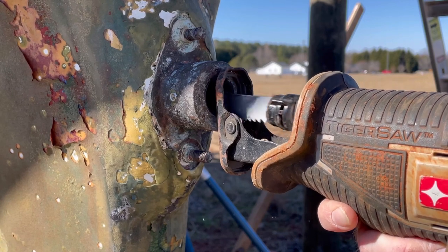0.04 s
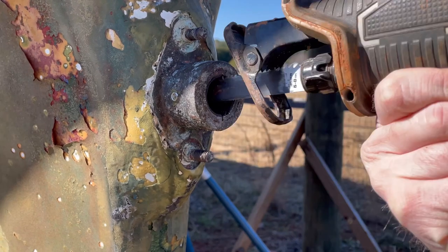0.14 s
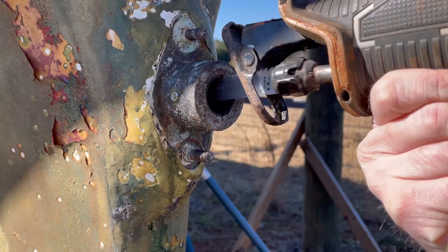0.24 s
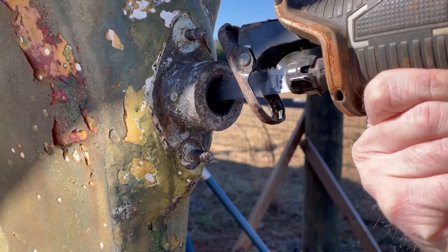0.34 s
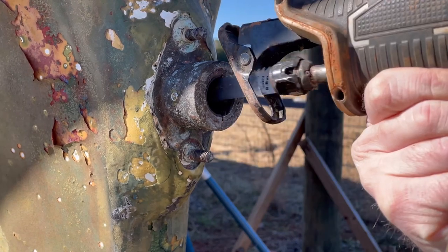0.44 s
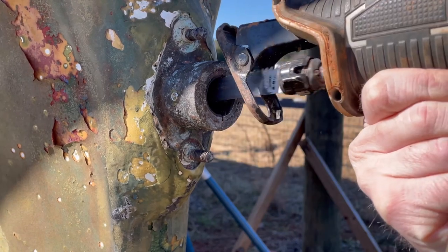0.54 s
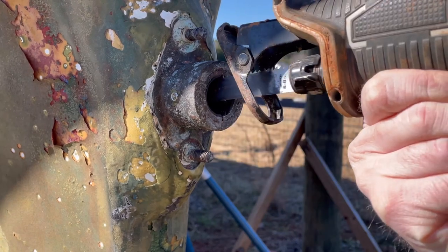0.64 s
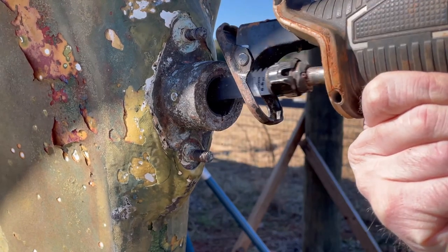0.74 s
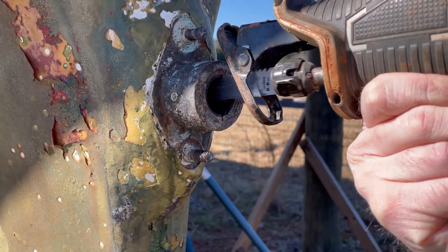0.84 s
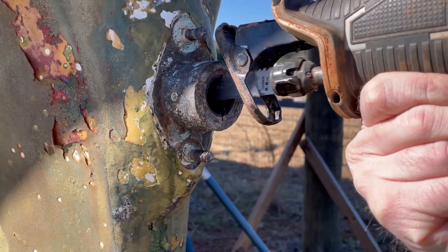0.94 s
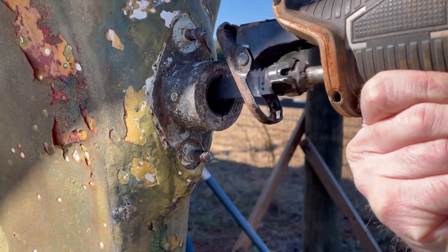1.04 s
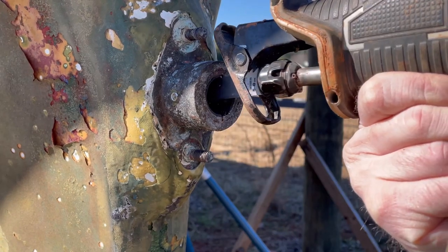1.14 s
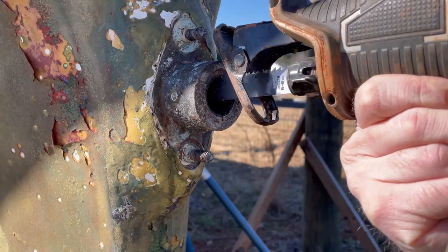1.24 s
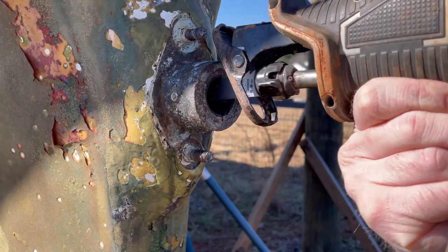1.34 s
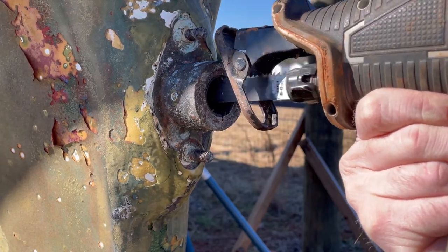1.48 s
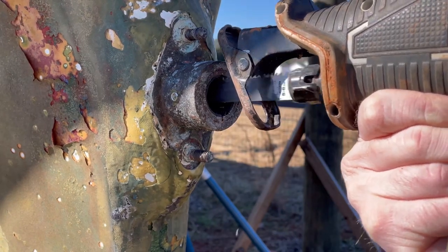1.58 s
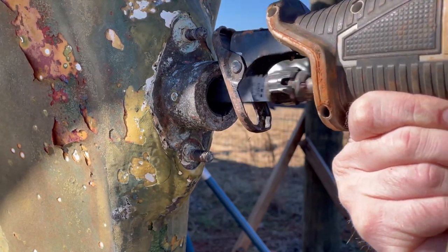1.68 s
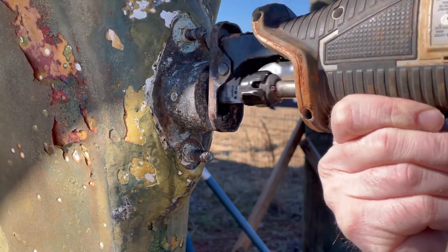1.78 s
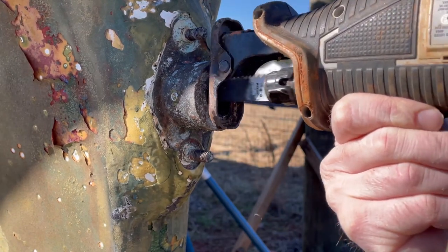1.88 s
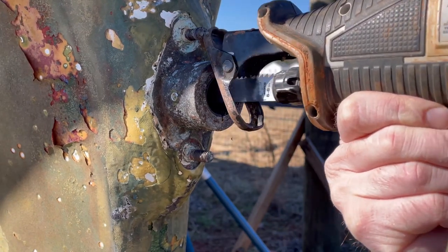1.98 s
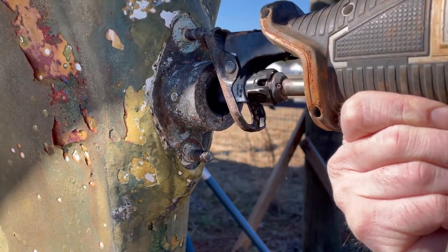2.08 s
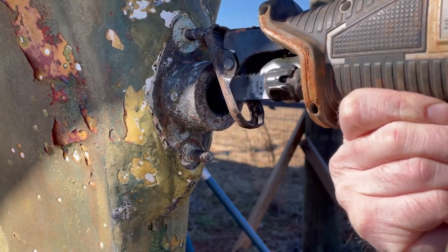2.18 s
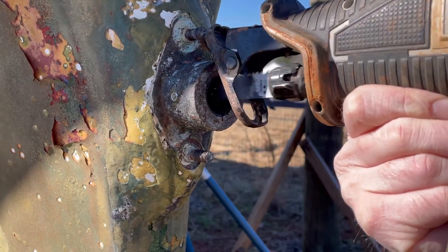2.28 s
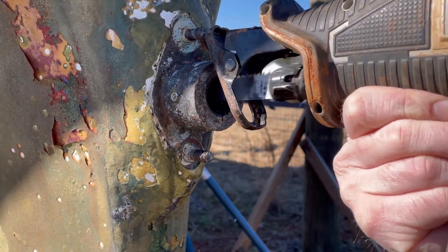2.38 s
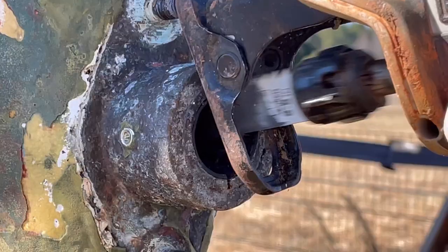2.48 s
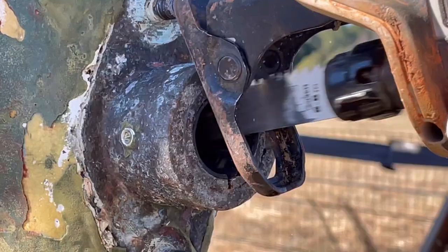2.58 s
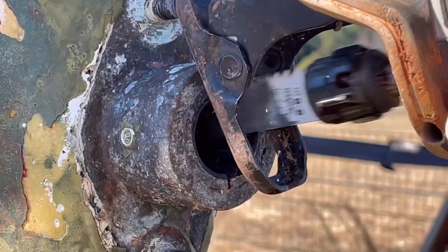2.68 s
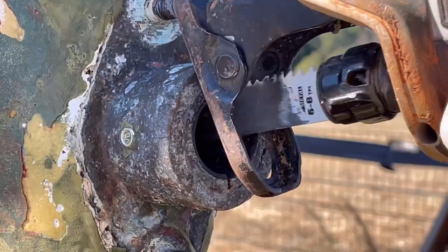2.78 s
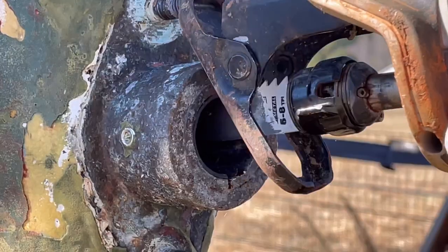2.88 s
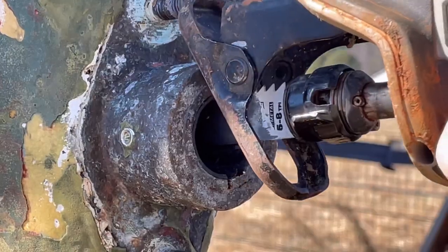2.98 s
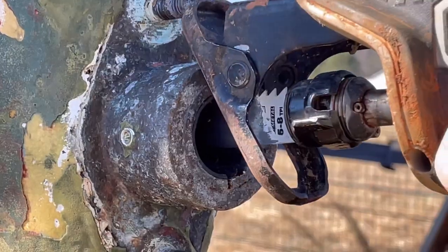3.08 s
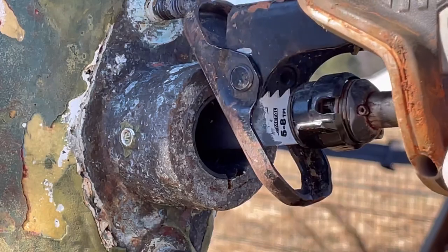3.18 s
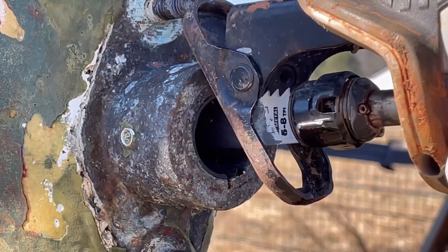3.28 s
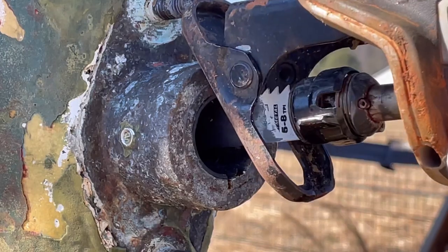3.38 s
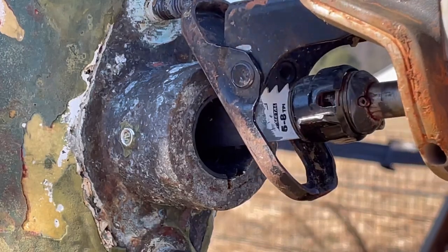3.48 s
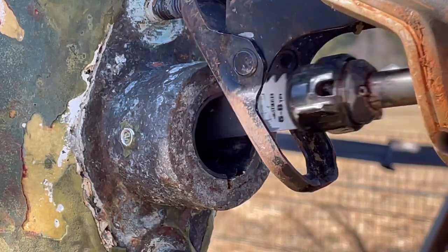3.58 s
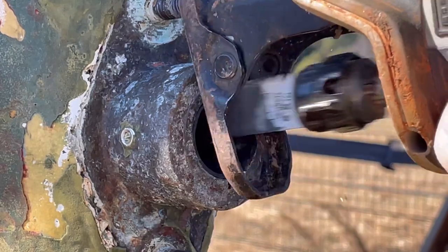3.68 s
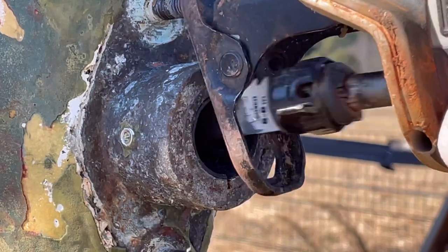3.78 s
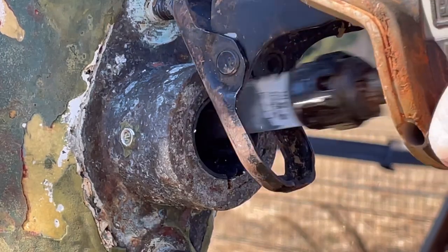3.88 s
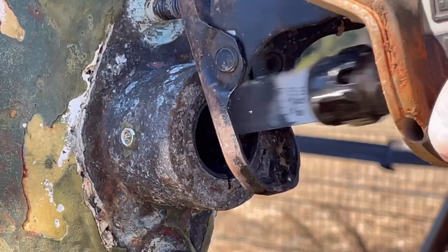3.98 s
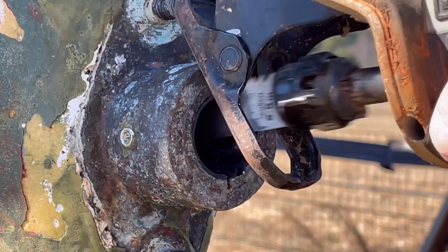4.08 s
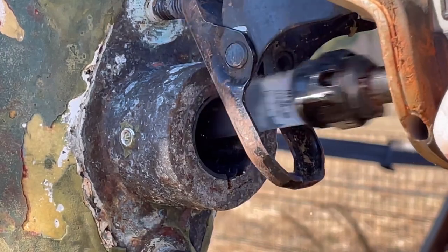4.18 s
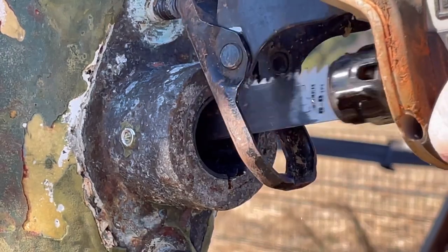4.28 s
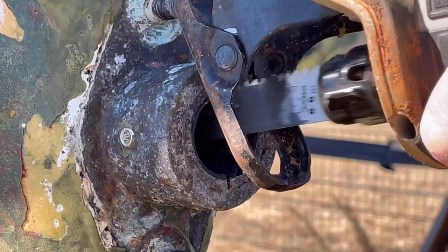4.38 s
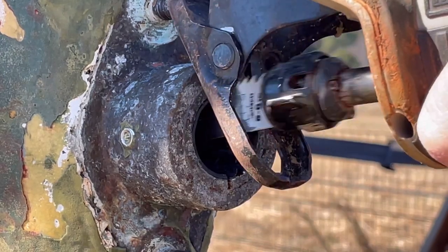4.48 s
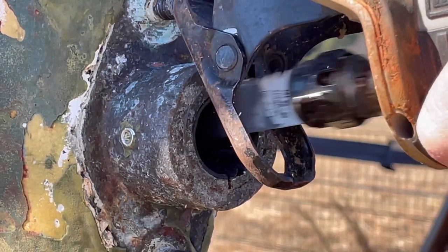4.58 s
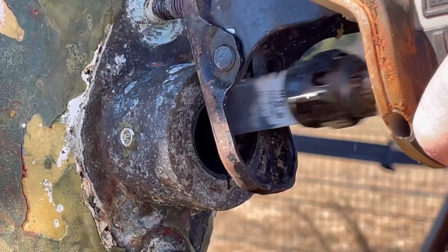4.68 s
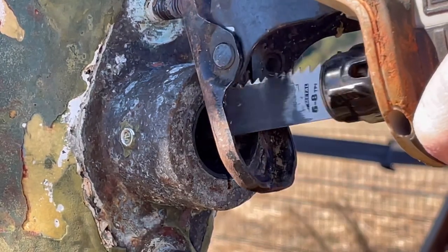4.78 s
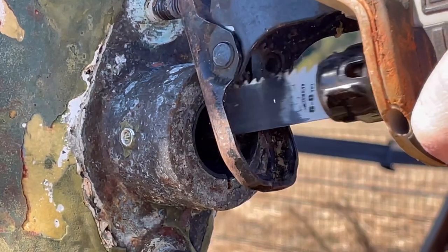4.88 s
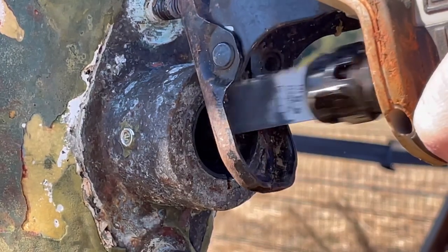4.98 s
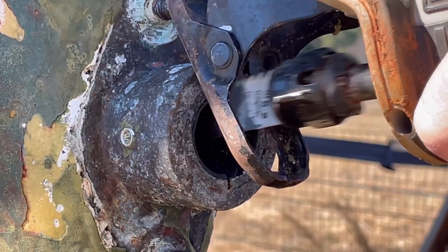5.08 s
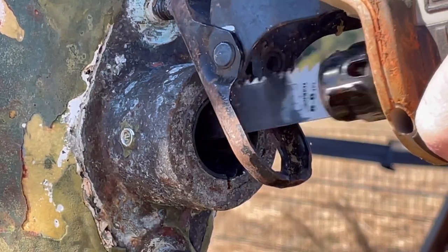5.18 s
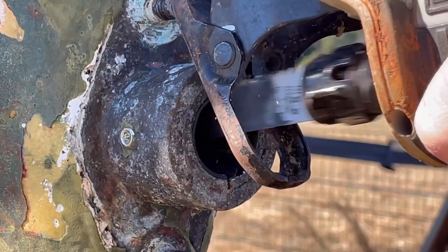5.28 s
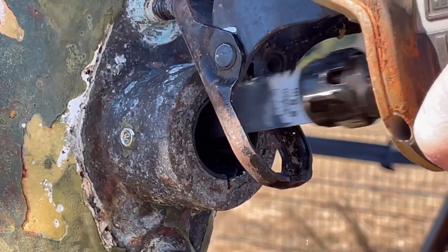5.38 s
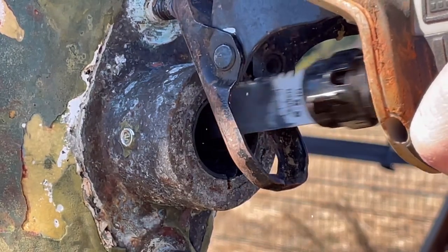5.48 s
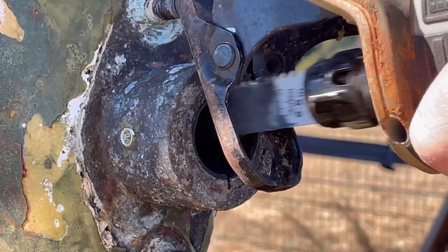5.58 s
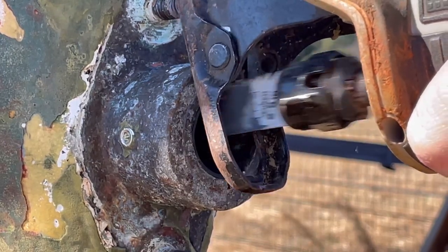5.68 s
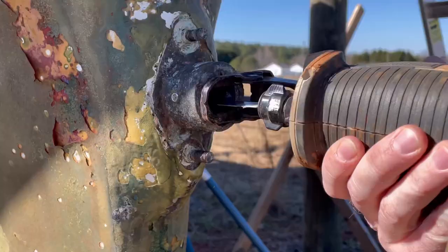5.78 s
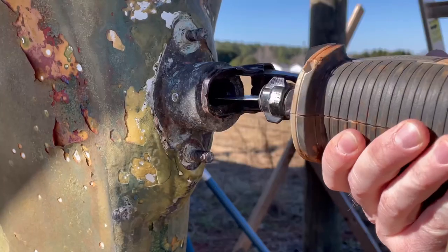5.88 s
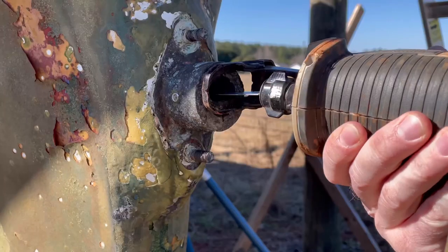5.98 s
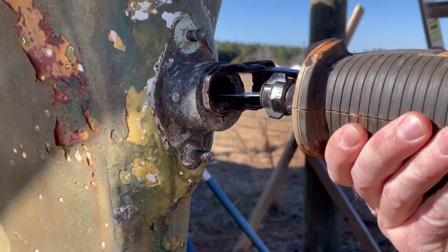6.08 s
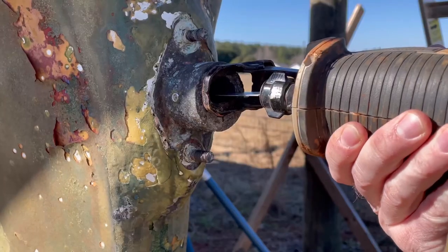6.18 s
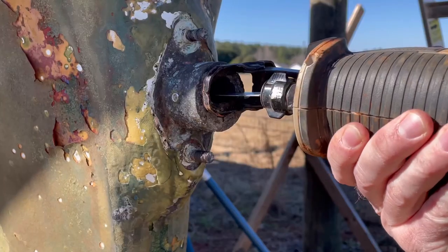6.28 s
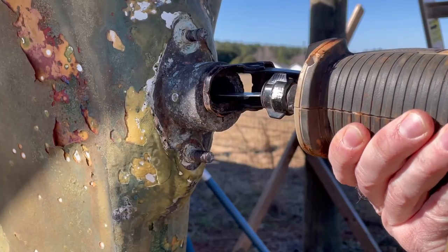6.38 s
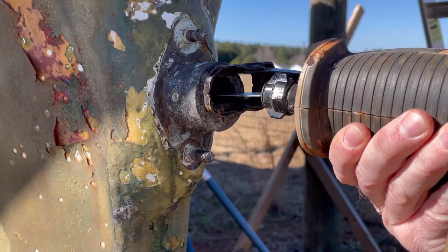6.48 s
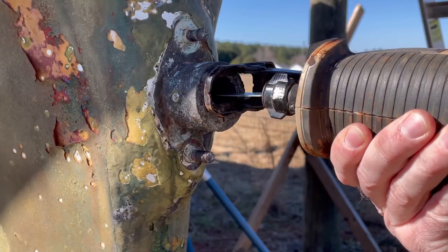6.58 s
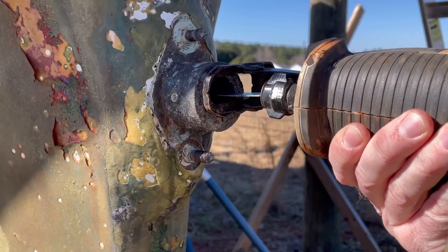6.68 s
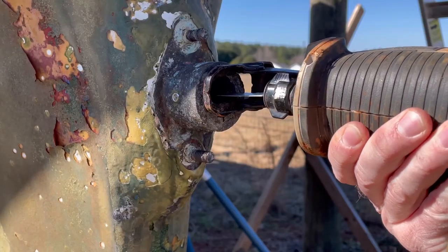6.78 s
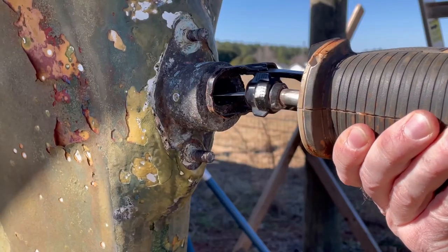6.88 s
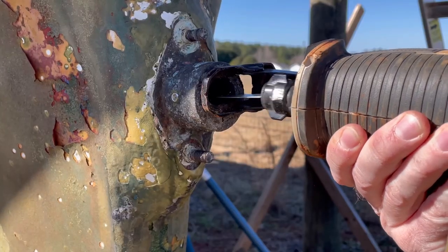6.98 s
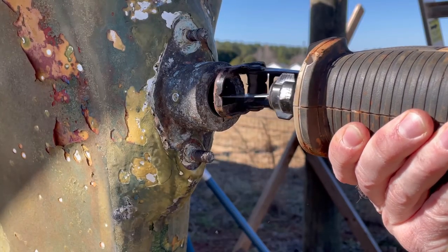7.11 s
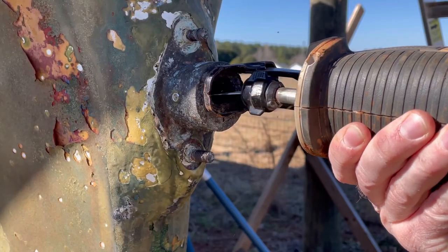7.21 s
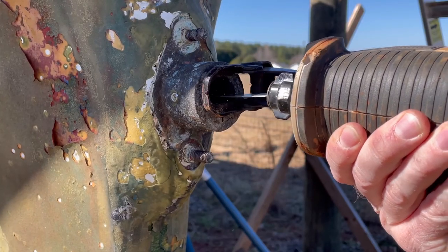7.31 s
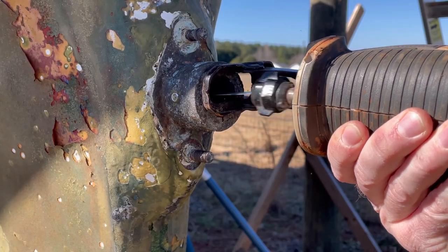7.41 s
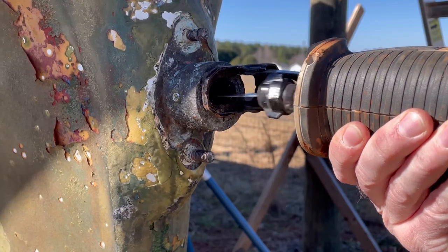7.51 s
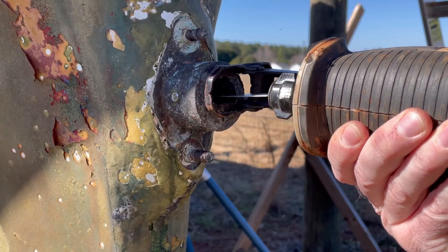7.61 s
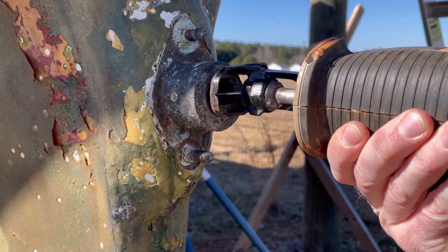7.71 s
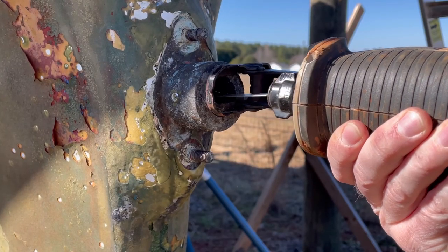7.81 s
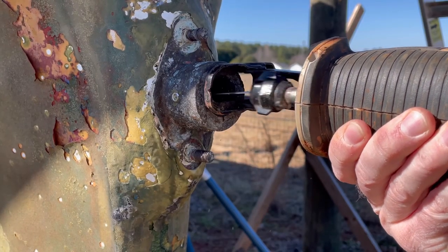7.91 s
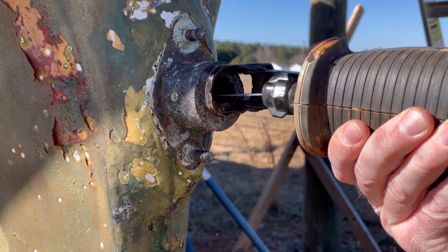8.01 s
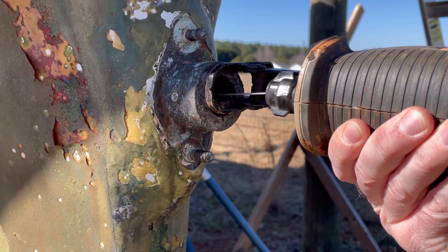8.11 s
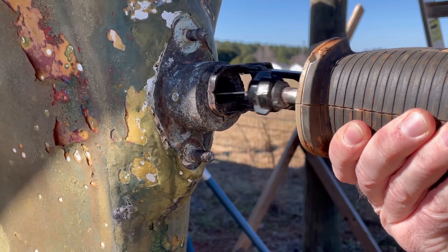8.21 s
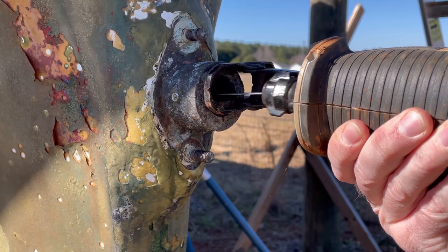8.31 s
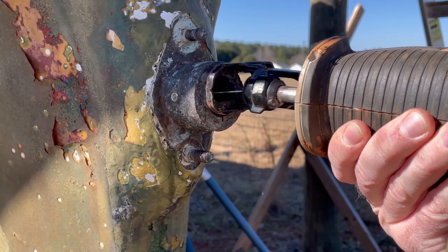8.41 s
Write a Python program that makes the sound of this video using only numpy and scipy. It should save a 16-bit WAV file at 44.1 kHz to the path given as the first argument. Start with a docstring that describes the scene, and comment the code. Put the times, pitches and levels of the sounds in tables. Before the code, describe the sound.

A reciprocating saw rasps and hammers through a metal fitting outdoors, bogging, stalling and restarting twice, with heavy wind buffeting the microphone before the last pass.

```python
"""A reciprocating saw cuts a metal fitting on a boat hull, outdoors and close: five passes, two pauses.
Teeth rasp as grainy noise; crank-timed clicks knock at the slide and ring the fitting; the thin blade
rings in the treble through narrow resonances. Clanks, slaps, pings, whines and take-ups are single events.
Wind is coloured noise with gusts, eddies and pressure puffs, hardest in the second pause."""
import sys
import numpy as np
from scipy import signal
from scipy.fft import rfft, irfft, next_fast_len
from scipy.io import wavfile
from scipy.ndimage import uniform_filter1d

SR = 44100
rng = np.random.default_rng(int(sys.argv[2]) if len(sys.argv) > 2 else 0)


def inscribe(sig):
    """Save sig as 16-bit PCM at rate SR to the path in sys.argv[1].

    A 1-D sig is mono; a 2-D sig holds one channel per row.
    Samples are clipped to [-1, 1] before scaling.
    """
    pcm = np.round(np.clip(np.atleast_2d(sig).T, -1, 1) * 32767)
    wavfile.write(sys.argv[1], SR, pcm.astype(np.int16))


N = 372637
TIME = np.arange(N) / SR
RATTLE_S = 0.0023  # decay of a knock's rattle

# passes of the saw: (start [s], end [s])
PASSES = [(0, .146), (.146, 2.441), (2.443, 3.1), (3.5, 5.812), (6.8, 8.45)]
# colour of saw and fitting in the usual grip: (frequency [Hz], relative density [dB])
USUAL_GRIP = [(76, -16), (130, -8), (250, -6), (456, -1.5), (577, -2.5), (985, 6), (1630, 5.5), (1800, 2.5),
              (2200, 4.5), (3760, -0.5), (4370, 1.5), (5170, -4), (7100, -4), (9230, -59), (15600, -120)]
# ringing modes of the blade: (frequency [Hz], width [Hz], relative level [dB])
BLADE_MODES = [(7370, 75, -13), (8600, 200, -12), (9720, 85, -11), (10800, 90, -7.5), (12430, 120, -21),
               (14090, 100, -16)]


def from_db(db):
    """Decibels to gain."""
    return 10 ** (np.asarray(db) / 20)


def rms_one(x):
    """Scale to unit power."""
    return x / np.sqrt(np.mean(x ** 2) + 1e-20)


def columns_at(rows, t):
    """Each column of a curve table, interpolated at times t."""
    s, *columns = np.transpose(rows)
    return [np.interp(t, s, c) for c in columns]


def at_hz(points, hz):
    """A spectrum table read on a log-frequency axis."""
    f, value = np.transpose(points)
    return np.interp(np.log(hz + 1e-3), np.log(f), value)


def swells(rows, t):
    """Sum of trapezoids: each row rises to its height, holds and falls back; its times are sorted."""
    return sum(np.interp(t, np.sort(times), [0, height, height, 0]) for *times, height in rows)


def drift(size, rate_hz):
    """Smooth chance with unit power, redrawn at rate_hz."""
    count = int(size / SR * rate_hz) + 4
    points = rng.standard_normal(count)
    return rms_one(np.interp(np.arange(size) * rate_hz / SR, np.arange(count), points))


def colour(x, spectrum, band_hz):
    """Minimum-phase filter with the given spectrum; unit white noise gets unit power inside the band."""
    size = 2 * next_fast_len(len(x) // 2 + 2048)
    hz = np.arange(size // 2 + 1) * SR / size
    gain = from_db(at_hz(spectrum, hz))
    gain /= np.sqrt(np.mean(gain ** 2 * (hz > band_hz[0]) * (hz < band_hz[1])))
    # folding the cepstrum makes the filter causal
    cepstrum = irfft(np.log(gain))
    cepstrum[1:size // 2] *= 2
    cepstrum[size // 2 + 1:] = 0
    return irfft(rfft(x, size) * np.exp(rfft(cepstrum)))[:len(x)]


def cut_off(x, hz, kind, order=4):
    """Butterworth filter."""
    return signal.sosfilt(signal.butter(order, hz, kind, fs=SR, output="sos"), x)


def resonate(x, hz, width_hz):
    """Two-pole resonance with gain 1 at its peak."""
    r = np.exp(-np.pi * width_hz / SR)
    zeros = np.array([1, 0, -1]) * (1 - r * r) / 2
    poles = [1, -2 * r * np.cos(2 * np.pi * hz / SR), r * r]
    return signal.lfilter(zeros, poles, x + 1e-18)


def ring(clicks, hz, width_hz):
    """Each click starts a decaying ring of about its own height."""
    return resonate(clicks, hz, width_hz) * SR / (2 * np.pi * width_hz)


def die_away(clicks, decay_s):
    """Each click starts an exponential decay of its own height."""
    return signal.lfilter([1], [1, -np.exp(-1 / (decay_s * SR))], clicks + 1e-18)


def sparks(size, per_s, spread_db):
    """Clicks at random moments, mostly small and now and then large."""
    return (rng.random(size) < per_s / SR) * from_db(spread_db * np.minimum(rng.exponential(1, size), 3))


def click_train(events):
    """One click for each row (time [s], level [dB])."""
    clicks = np.zeros(N)
    for s, db in events:
        clicks[round(s * SR)] = from_db(db)
    return clicks


def fitting(clicks, detune_ratio=1.04, wander_above_hz=2500):
    """Each knock rings every mode at a random strength; the contact wanders, so high modes go sharp, true or flat."""
    # modes of fitting and shoe: (frequency [Hz], width [Hz], relative level [dB])
    fitting_modes = [(472, 36, -31), (963, 130, -10.5), (1530, 1200, 5), (2110, 90, -8), (2877, 190, 3.5),
                     (3320, 100, -9), (4350, 140, -0.5)]
    at, out = np.flatnonzero(clicks), 0
    for hz, width_hz, db in fitting_modes:
        chance = rng.random((len(at), 2))
        strength = from_db(db + 10 * chance[:, 0] - 6)
        pitch_choice = np.floor(3 * chance[:, 1])
        for k in range(3):
            blows = np.zeros(len(clicks))
            blows[at] = clicks[at] * strength * (pitch_choice == k)
            ratio = detune_ratio ** ((k - 1) * (hz > wander_above_hz))
            # the mode's own pitch sets the wander, not its width
            out = out + ring(blows, hz * ratio, width_hz)
    return out


def knocks(strokes, bind, contacts, play_s=.00015, vary_db=-0.13):
    """A click as the crank passes each contact; binding shifts and re-levels it, slide play jitters it."""
    clicks = np.zeros(len(strokes))
    for place, bound_place, db, bound_db in contacts:
        turns = np.floor(strokes - place - bind * (bound_place - place))
        at = np.flatnonzero(np.diff(turns) > 0)
        chance = np.clip(rng.standard_normal((len(at), 2)), -2, 2)
        at = np.clip(at + (chance[:, 0] * play_s * SR).astype(int), 0, len(strokes) - 1)
        clicks[at] += from_db(db + bind[at] * (bound_db - db) + vary_db * chance[:, 1])
    return clicks


def blade_ring(flex, t, lead_db):
    """Blade modes at unit power; pinching in the cut smears the strongest into a broad resonance."""
    # how hard the cut pinches the blade: (time [s], share [0-1])
    pinch_curve = [(1.4, .95), (1.68, 0.04)]
    # strongest mode running free: (time [s], relative level [dB])
    lead_curve = [(1.7, 1), (2.4, -2.5)]
    pinched_width_hz, pinched_db = 1300, -22
    pinch, = columns_at(pinch_curve, t)
    lead_hz = max(BLADE_MODES, key=lambda mode: mode[2])[0]
    free = np.sqrt(1 - pinch) * from_db(lead_db + columns_at(lead_curve, t)[0])
    modes = sum(from_db(db) * (free if hz == lead_hz else 1) * resonate(flex, hz, width_hz)
                for hz, width_hz, db in BLADE_MODES)
    smeared = np.sqrt(pinch) * from_db(pinched_db) * resonate(flex, lead_hz, pinched_width_hz)
    return rms_one(modes + smeared)


def gears(strokes, waver_db=3, stagger_rad=0.17):
    """Gear drone: sines on multiples of the stroke rate, louder with speed, each wavering on its own."""
    # favoured multiples: (multiple of stroke rate, relative level [dB])
    orders = [(5, 4), (7, 4), (8, -3), (10, -2), (11, 0), (12, -3), (13, 5), (14, 2), (15, 3), (17, 0)]
    # colour of the housing: (frequency [Hz], level against the loudness of the cut [dB])
    housing = [(150, -29.5), (195, -23), (260, -25), (330, -27.5), (400, -25), (480, -16.5), (560, -26),
               (720, -18.5)]
    reference_per_s, db_per_rate = 42.9, 1.1  # strokes per s; dB per stroke per s
    size = len(strokes)
    rate = np.maximum(np.gradient(strokes) * SR, 0)
    drive_db = db_per_rate * (rate - reference_per_s)
    out = 0
    for k, db in orders:
        level_db = db + at_hz(housing, k * rate) + drive_db + waver_db * drift(size, 6)
        phase = 2 * np.pi * k * strokes + stagger_rad * drift(size, 25)
        out = out + from_db(level_db) * np.sqrt(2) * np.sin(phase)
    return out


def evened(force):
    """Level to unit power over a few strokes."""
    return force / np.sqrt(uniform_filter1d(uniform_filter1d(force ** 2, 3000), 3000) + 1e-12)


def saw_pass(t, balance, speed, contacts, cut, grip, hiss_knock=1.24, bite_knock=0.94, bind_clang_db=5):
    """One pass: teeth catch and rasp along the stroke, knocks rattle, and both drive fitting and blade."""
    # blade binds in the cut: (begins [s], full [s], eases [s], free [s], depth [0-1])
    binds = [(.42, .85, 1.38, 1.53, 0.98), (4.7, 5.45, 5.85, 5.9, 0.83)]
    # tool shudders: (four corner times [s], added shaking [dB])
    shudders = [(.3, 1.05, 1.2, 1.39, 16.5), (4.7, 4.95, 6.7, 6, 6)]
    # hiss of chips: (frequency [Hz], relative density [dB])
    chip_colour = [(5500, -49.5), (7200, 7.5), (9000, 6.5), (10300, -3), (11300, -1), (12300, -3),
                   (13100, -12), (14200, 7), (14700, 3), (15700, -7)]
    teeth_per_s, tooth_db, tooth_s = 470, -14.5, 0.0021
    rattle_tail_s, tail_share, thud_db, knock_ring_db = 0.0047, 0.18, 20.5, -12.5
    # change at full binding
    bind_rasp_db, bind_ring_db, bind_gear_db, bind_rumble_db = 3.5, 0.5, 9, -2.5
    rumble_db, crank_wobble = -22.5, .005  # wobble in strokes

    size, bind = len(t), swells(binds, t)
    bite_db, chip_db, blade_db, shake_db, lead_db, gear_db = balance
    loud_db, = columns_at(cut, t)
    rate = columns_at(speed, t)[0] * (t >= speed[0][0])
    strokes = np.cumsum(rate) / SR + crank_wobble * drift(size, 9)
    clicks = knocks(strokes, bind, contacts)
    rattle = die_away(clicks, RATTLE_S) + tail_share * die_away(clicks, rattle_tail_s)
    # a catching tooth lets go at once
    catches = die_away(sparks(size, teeth_per_s, spread_db=4), tooth_s)
    rasp = (.5 + from_db(tooth_db) * catches) * from_db(bind_rasp_db * bind)

    def friction(knock_share):
        """Grainy force of teeth and rattling parts."""
        return np.hypot(rasp, knock_share * rattle) * rng.standard_normal(size)

    # identical pushes bring out low harmonics of the stroke rate
    thud = from_db(thud_db) * cut_off(clicks, 700, "low", order=2)
    rings = from_db(knock_ring_db + bind_clang_db * bind) * fitting(clicks)
    # teeth are too small to make bass
    scrape = cut_off(friction(1), 380, "high", order=2)
    body = colour(evened(scrape + thud + rings), grip, (200, 3400))
    body = rms_one(cut_off(body, 3400, "low", order=6))
    bite = colour(evened(friction(bite_knock) + rings), grip, (3400, 7000))
    bite = rms_one(cut_off(bite, [3400, 7100], "band", order=5)) * from_db(bite_db)
    chips = colour(evened(friction(hiss_knock)), chip_colour, (11200, 12200)) * from_db(chip_db)
    blade = blade_ring(evened(friction(hiss_knock)), t, lead_db) * from_db(blade_db + bind_ring_db * bind)
    # the slide throws the whole tool twice a stroke
    shake = np.sqrt(2) * np.sin(4 * np.pi * strokes) * from_db(shake_db + swells(shudders, t))
    drone = from_db(gear_db + bind_gear_db * bind) * gears(strokes)
    # the shaken housing rumbles; a binding blade steadies it
    rumble = rms_one(cut_off(friction(1), [45, 300], "band", order=2))
    rumble *= from_db(rumble_db + bind_rumble_db * bind)
    cutting = from_db(loud_db) * (body + bite + chips + blade + drone + rumble)
    return (cutting + shake) * signal.windows.tukey(size, 200 / size)


def saw():
    """All passes in turn, each with its own crank speed, contacts, loudness and grip."""
    # per pass: (bite, chips, blade [dB over the cut], shaking [dB], lift of strongest blade mode, of drone [dB])
    balances = [(-2.5, -12.5, -17, -48, -2, -6.5), (-6, -22, -6.5, -48.5, -3.5, -7.5),
                (-3.5, -19, -3, -74.5, 2.5, 1.5), (-2.5, -18, -4, -55, 2.5, -8),
                (-8, -19, -2, -77, 5.5, -9)]
    # crank speed, a table per pass, first row starts the stroke count: (time [s], rate [strokes per s])
    speeds = [
        [(0, 40), (.05, 35.5)],
        [(.15, 25.7), (.32, 31.06), (.92, 28.12), (1.2, 30.76), (1.47, 31.96), (1.63, 40.71), (1.85, 41.83),
         (2.15, 40.16), (2.44, 40.1)],
        [(2.45, 40.5), (2.6, 39), (2.7, 26), (2.76, 12), (2.88, 0)],
        [(3.55, 22.99), (3.74, 41.18), (3.92, 41.51), (4.3, 40.11), (4.7, 39.79), (5.3, 37.04), (5.81, 34.71)],
        [(6.82, 21.41), (6.91, 38.84), (7.02, 43.12), (7.35, 41.97), (8.45, 42.32)],
    ]
    # slide and shoe contacts, a table per pass:
    # (place in stroke free, place binding [0-1], relative level free, level binding [dB])
    contact_tables = [
        [(0.7, .79, -4, 4), (0.01, .01, 7, 7)],
        [(.77, .9, 6, -8), (.36, .42, 5, 10), (0.96, 0.95, -1.5, 12)],
        [(0.7, .65, 5.5, 3), (0.4, .15, 8, 7)],
        [(.52, .52, 7, 10.5), (0, 0, -2, 10.5)],
        [(.57, .57, 0.5, 3.5), (.76, .76, 1.5, 2), (0.14, .19, 2, 3)],
    ]
    # loudness as the saw is pressed and eased, a table per pass: (time [s], level [dB])
    cuts = [
        [(0, -24), (.14, -28.5), (.146, -15)],
        [(.15, -36), (.18, -24.5), (.25, -21.5), (1.47, -23.5), (1.58, -21), (1.92, -20.5), (2.44, -26)],
        [(2.443, -30.5), (2.475, -22), (2.727, -27.5), (2.82, -55), (2.9, -76), (3.1, -87)],
        [(3.5, -56), (3.525, -36.5), (3.6, -25), (3.83, -20.5), (4.45, -25.5), (5.81, -26.5)],
        [(6.8, -54), (6.82, -36), (6.84, -20), (6.92, -21.5), (7.12, -20.5), (7.22, -25.5), (8.45, -26)],
    ]
    # colour in the second pass's grip: (frequency [Hz], relative density [dB])
    second_grip = [(76, -64.5), (130, -18), (179, -15), (361, -5.5), (741, -3.5), (1000, 3.5), (1220, -0.5),
                   (1800, 1), (1980, -.5), (2120, 2.5), (2270, 0), (2430, -2.5), (2730, 2.5), (3180, -4.5),
                   (4370, -6.5), (5000, -9.5), (7100, -10), (9230, -9.5), (15600, -120)]
    # colour in the last pass's grip: (frequency [Hz], relative density [dB])
    last_grip = [(76, -44), (130, 4), (179, -19), (413, -1), (606, -4.5), (670, -1), (729, -1.5),
                 (1740, 2.5), (1890, 6.5), (2160, -1), (2390, 3), (3290, -2.5), (3950, -4.5), (4520, -4.5),
                 (5080, -8.5), (7100, -15), (9230, -43), (15600, -120)]
    grips = [USUAL_GRIP, second_grip, USUAL_GRIP, USUAL_GRIP, last_grip]
    out = np.zeros(N)
    for (start, end), *controls in zip(PASSES, balances, speeds, contact_tables, cuts, grips):
        on = (TIME >= start) & (TIME < end)
        out[on] += saw_pass(TIME[on], *controls)
    return out


def hull_echo(x, delay_s=0.0049, top_hz=430, level_db=-13):
    """The hull returns the low end of the tool a little later."""
    return from_db(level_db) * cut_off(np.interp(TIME - delay_s, TIME, x), top_hz, "low", order=2)


def wind_strength(rise_s=0.035, fall_s=0.045, breeze_db=-55, swing_db=1):
    """Level [dB] of a wavering breeze plus gusts that rise, hold and die away, summed as power."""
    # gusts: (full at [s], hold [s], level [dB])
    gusts = [(1.545, 0.29, -40.5), (2.022, 0.35, -38.5), (2.617, 0.12, -38.5), (2.926, 0.074, -47),
             (3.076, 0.037, -42), (3.3, 0.087, -46), (3.64, 0.082, -44.5), (5.3, 0.25, -48),
             (5.83, 0.53, -23), (6.318, 0.5, -23), (6.33, 0.055, -23), (6.898, 0.21, -25.5),
             (7.06, 0.1, -24)]
    power = from_db(breeze_db) ** 2
    for full_s, hold_s, db in gusts:
        rise = np.clip(1 + (TIME - full_s) / rise_s, 0, 1)
        fall = np.exp(-np.maximum(TIME - full_s - hold_s, 0) / fall_s)
        power = power + (from_db(db) * rise * fall) ** 2
    return 10 * np.log10(power) + swing_db * drift(N, 33)


def eddies(per_s=240, spread_db=4, relative_width=.7):
    """Small eddies: random clicks through broad resonances, each at one of nine pitches; unit power."""
    clicks = sparks(N, per_s, spread_db) * rng.choice([-1, 1], N)
    pitches_hz, dealt = np.geomspace(180, 1300, 9), rng.integers(0, 9, N)
    return rms_one(sum(resonate(clicks * (dealt == k), hz, relative_width * hz)
                       for k, hz in enumerate(pitches_hz)))


def wind(hiss_db=-53, lumpy_db=3.0, clump_db=5, rumble_db=-7, buffet_db=-4, flutter_db=-14.0,
         gust_db=-26, steepness=0.41):
    """Eddies at the microphone: large ones rumble and buffet, small ones flutter, growing faster than the gust."""
    # each spectrum: (frequency [Hz], relative density [dB])
    rumble_colour = [(12, -22.5), (25, 1.5), (45, 39.5), (70, -12.5), (110, -14)]
    buffet_colour = [(35, -17.5), (70, 6), (120, 0), (220, -5), (400, -20.5), (800, -35.5), (2000, -51.5),
                     (6000, -78)]
    flutter_colour = [(150, -14), (320, 9.5), (520, 1), (900, -4), (1600, -30), (4000, -46), (9000, -59.5)]
    level_db = wind_strength()
    rumble = colour(rng.standard_normal(N), rumble_colour, (20, 48))
    lumpy = rms_one(from_db(lumpy_db * drift(N, 70)) * rng.standard_normal(N))
    buffet = colour(lumpy, buffet_colour, (90, 260))
    flutter = rms_one(cut_off(colour(eddies(), flutter_colour, (260, 1000)), 1200, "low", order=2))
    flutter *= from_db(flutter_db + steepness * (level_db - gust_db))
    lumps = cut_off(from_db(rumble_db) * rumble + from_db(buffet_db) * buffet, 1200, "low", order=2)
    hiss = from_db(hiss_db) * rng.standard_normal(N)  # air rushing over the ports
    clumps = from_db(clump_db * np.minimum(drift(N, 50), 1))  # eddies come in swells with gaps
    return from_db(level_db) * (lumps + clumps * (flutter + hiss))


def air():
    """Steady coloured noise, independent in each channel."""
    # (frequency [Hz], relative density [dB])
    air_colour = [(120, -13), (200, -15), (338, -39), (683, -7.5), (2000, -24), (6000, -34.5), (7970, -49),
                  (11900, -76.5), (15000, -62.5)]
    return from_db(-74.5) * np.array([colour(rng.standard_normal(N), air_colour, (200, 15000))
                                      for _ in range(2)])


def puffs(crackle_s=0.0028, crackle_hz=1900, sag=0.49):
    """Wind puffs: rounded pressure swings sinking in pitch, with a short dull crackle at the front."""
    # (time [s], swing level [dB], pitch after one cycle [Hz], crackle level [dB])
    puff_events = [(0.219, -25, 318, -49), (1.563, -19, 360, -51), (1.617, -26, 315, -53.5),
                   (2.001, -22.5, 340, -53), (2.352, -22, 344, -50), (2.918, -47, 218, -65),
                   (2.974, -44, 212, -67), (3.072, -32, 216, -60), (3.097, -38, 210, -61),
                   (3.146, -38, 196, -64), (3.286, -38, 225, -67), (3.333, -34.5, 193, -57),
                   (3.382, -44, 223, -62), (3.631, -17, 336, -44), (5.863, -15, 430, -21.5),
                   (5.89, -25, 600, -36), (5.904, -28, 560, -31), (5.922, -24, 383, -37),
                   (5.975, -17, 490, -26), (5.984, -13, 250, -24), (6.017, -17.5, 640, -22.5),
                   (6.052, -25, 383, -39), (6.141, -18, 370, -36), (6.173, -17, 424, -37),
                   (6.195, -20, 488, -34), (6.263, -16, 800, -30), (6.303, -21, 597, -30),
                   (6.316, -5.5, 567, -33), (6.33, -2.5, 480, -34), (6.352, -15, 472, -38),
                   (6.358, -12, 227, -38), (6.399, -15.5, 354, -36), (6.418, -12, 420, -32),
                   (6.449, -19, 414, -39), (6.497, -26, 710, -33), (6.509, -15.5, 885, -26),
                   (6.541, -15.5, 630, -26), (6.55, -11.5, 415, -30.5), (6.587, -19, 467, -34),
                   (6.606, -35, 456, -39), (6.673, -19, 520, -26), (6.695, -16.5, 1400, -14.5),
                   (6.757, -9, 130, -35), (6.781, -10, 443, -21), (6.79, -13, 170, -42),
                   (6.991, -16, 340, -30), (7.075, -9.5, 337, -31), (7.123, -4, 370, -11.5),
                   (7.138, -16, 409, -30), (7.166, -15, 393, -33)]
    out = np.zeros(N)
    for s, db, hz, _ in puff_events:
        at = round(s * SR)
        # sag: natural log of the pitch ratio per cycle
        cycles = np.log1p(sag * np.exp(sag) * hz * TIME[:SR // 10]) / sag
        swell = (cycles * np.exp(1 - cycles)) ** 3  # peaks after one cycle
        out[at:at + len(cycles)] += from_db(db) * np.sin(2 * np.pi * cycles) * swell
    fronts = click_train([(s, db) for s, _, _, db in puff_events])
    crackle = die_away(fronts, crackle_s) * rng.standard_normal(N)
    return out + cut_off(crackle, crackle_hz, "low", order=3)


def slaps(level_db=2.5, width_hz=1050, decay_s=.003):
    """The binding blade slaps the cut's sides: short noise decays through one broad resonance each."""
    # (time [s], relative level [dB], pitch [Hz])
    slap_events = [(0.8275, -6, 4370), (0.8629, -5, 2660), (0.8979, -4, 4330), (0.9333, -3, 4320),
                   (0.9687, -3, 3300), (1.0031, -3, 3100), (1.1059, -2, 2950), (1.1543, -9, 2760),
                   (1.1707, -4, 3010), (1.2037, -4, 2630), (1.2685, -3, 4300), (1.3004, -2, 4070),
                   (1.3324, -2, 4200), (1.3648, -7, 2200), (1.397, -7, 3000), (1.4287, -8, 2650),
                   (1.49, -9, 2650), (4.6113, -11, 2850), (4.7116, -11, 1800), (4.737, -9, 3040),
                   (4.7884, -10, 2340), (4.8133, -3, 1660), (4.8388, -7, 1610), (4.8642, -8, 1680),
                   (4.8897, -7, 4340), (4.9411, -10, 2180)]
    out, t = np.zeros(N), TIME[:SR // 20]
    for s, db, hz in slap_events:
        at = round(s * SR)
        burst = np.exp(-t / decay_s) * rng.standard_normal(len(t))
        out[at:at + len(t)] += from_db(db + level_db) * resonate(burst, hz, width_hz)
    return out


def clanks(rattle_db=-13, ring_db=-19, blade_db=-7, hold_s=.002, tail_s=0.0037, tail_db=-14):
    """Blade snags, stalls, is set back and starts: a briefly held rattle rings fitting and blade."""
    # (time [s], relative level [dB])
    clank_events = [(2.4653, -7.5), (2.478, -1.5), (2.502, -13.5), (2.553, -3.5), (2.577, -7),
                    (2.6828, -6.5), (2.703, -10.5), (2.725, -13.5), (2.761, -12.5), (2.779, -30),
                    (2.797, -28), (2.8405, -24.5), (2.8579, -28), (2.876, -38), (3.4444, -41),
                    (3.4645, -24), (3.5508, -3), (3.5725, 0), (3.5907, -3), (3.6255, -10.5), (3.6428, -1.5),
                    (3.658, -12.5), (4.2365, -5.5), (4.3108, -1), (4.436, -2.5), (4.4864, -4),
                    (6.8255, -2.5), (6.8505, 0.5), (6.8675, -5), (6.9315, -2)]
    clicks = click_train(clank_events)
    hold = round(hold_s * SR)
    held = signal.lfilter(np.ones(hold), [hold], clicks)
    envelope = 1.5 * die_away(held, RATTLE_S / 2) + from_db(tail_db) * die_away(clicks, tail_s)
    force = envelope * rng.standard_normal(N)
    rattle = from_db(rattle_db) * colour(force, USUAL_GRIP, (200, 7000))
    blade = sum(from_db(db) * resonate(force, hz, width_hz) for hz, width_hz, db in BLADE_MODES)
    return rattle + from_db(ring_db) * fitting(clicks) + from_db(blade_db) * blade


def whines():
    """The motor whines thinly before it turns: a steady sine with soft edges."""
    # (start [s], end [s], pitch [Hz], rms level [dB])
    whine_events = [(3.464, 3.515, 3930, -57), (6.745, 6.817, 3900, -52)]
    out = 0
    for start, end, hz, db in whine_events:
        gate = uniform_filter1d(1.0 * (TIME > start) * (TIME < end), 300)
        out = out + from_db(db) * np.sqrt(2) * np.sin(2 * np.pi * hz * TIME) * gate
    return out


def take_ups(body_hz=420, body_width_hz=250, body_db=4):
    """The drive takes up slack as the trigger is squeezed: a swelling noise scrape that thumps the housing."""
    # (peak time [s], relative level [dB], rise [s], fall [s])
    take_up_events = [(3.471, -34.5, 0.0015, 0.0097), (3.52, -29, .0015, .006),
                      (6.731, -29, 0.0043, 0.0068), (6.753, -38, 0.0036, 0.0081)]
    envelope = 0
    for s, db, rise_s, fall_s in take_up_events:
        distance = np.maximum((s - TIME) / rise_s, (TIME - s) / fall_s)
        envelope = envelope + from_db(db) * np.exp(-np.minimum(distance, 20))
    force = rng.standard_normal(N) * envelope
    thump = from_db(body_db) * resonate(force, body_hz, body_width_hz)
    return colour(force, USUAL_GRIP, (200, 7000)) + thump


def pings(ping_hz=2450, width_hz=130, level_db=1.0):
    """The shoe touches the fitting: one short ring each time."""
    # (time [s], relative level [dB])
    ping_events = [(7.3952, -10.5), (7.49, -14), (7.5628, -13.5), (7.705, -15), (7.8228, -14.5),
                   (8.0368, -19), (8.0602, -17), (8.2024, -16), (8.4159, -13)]
    return from_db(level_db) * ring(click_train(ping_events), ping_hz, width_hz)


def scene(eddy_side_db=-22):
    """Saw in the middle, hull echo to one side until the last pass; wind leans right and differs between ports."""
    # lean of the wind to the right: (time [s], share [0-1])
    lean_curve = [(2.7, 0), (2.85, 0.1), (3.5, 0.22), (3.6, .5), (5.7, 0), (5.82, 0.04)]
    tool = saw() + clanks() + slaps() + take_ups() + pings() + whines()
    blowing = wind() + puffs()
    lean, = columns_at(lean_curve, TIME)
    echo = hull_echo(tool) * (TIME < PASSES[-1][0])  # the saw is set anew for the last pass
    side = echo - lean * blowing + from_db(eddy_side_db) * wind()
    return tool + blowing + side * np.array([[1], [-1]]) + air()


def record(dry):
    """Left channel gets a narrow dip and a treble lag; peaks are rounded and the top is cut."""
    # left against right: (frequency [Hz], phase [rad])
    port_phase = [(1550, 0), (1720, -.45), (1860, .45), (2100, 0), (6200, 0), (7400, -1.8), (7750, -2.95),
                  (8250, -3.18), (8700, -3.5), (11000, -6.28), (12300, -6.28), (13050, -6.8), (13400, -8.3),
                  (14600, -9.25)]
    # left against right: (frequency [Hz], level [dB])
    port_dip = [(1600, 0), (1780, -8), (1930, 0)]
    cutoff_hz = 15900
    size = 2 * next_fast_len(N // 2 + 2048)
    hz = np.arange(size // 2 + 1) * SR / size
    left = from_db(at_hz(port_dip, hz)) * np.exp(1j * at_hz(port_phase, hz))
    both = np.array([irfft(rfft(dry[0], size) * left)[:N], dry[1]])
    both = 1.1 * np.tanh(both / 1.1)
    return signal.sosfilt(signal.ellip(12, .1, 90, cutoff_hz, fs=SR, output="sos"), both)


dry = scene()
out = record(dry)
inscribe(out)
```